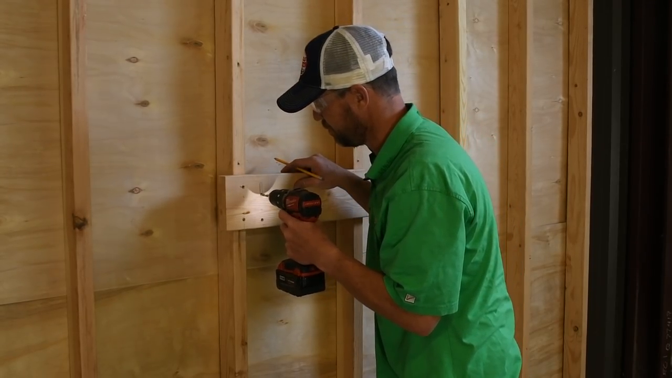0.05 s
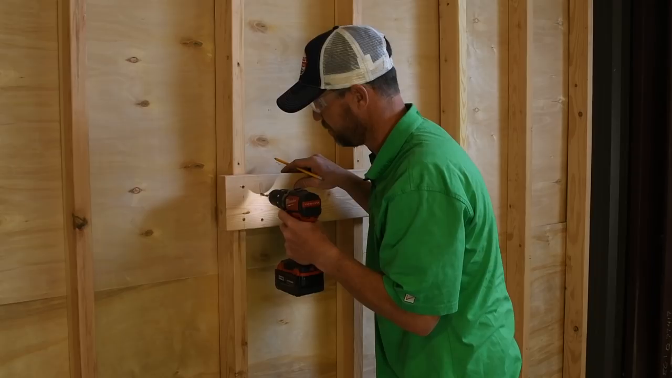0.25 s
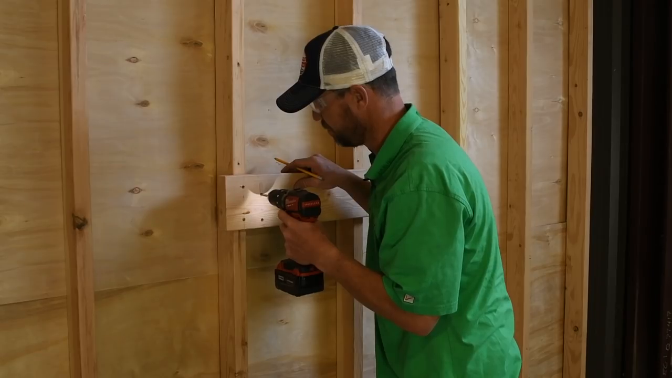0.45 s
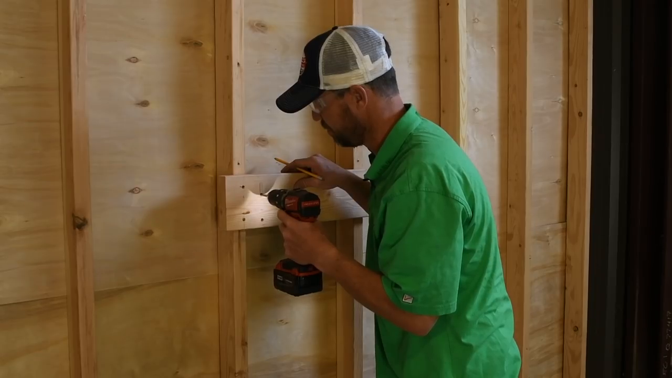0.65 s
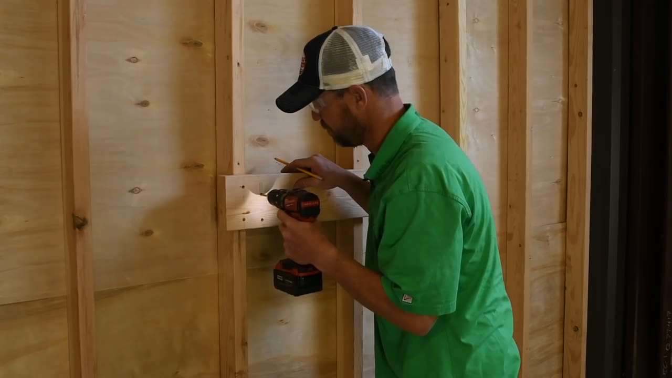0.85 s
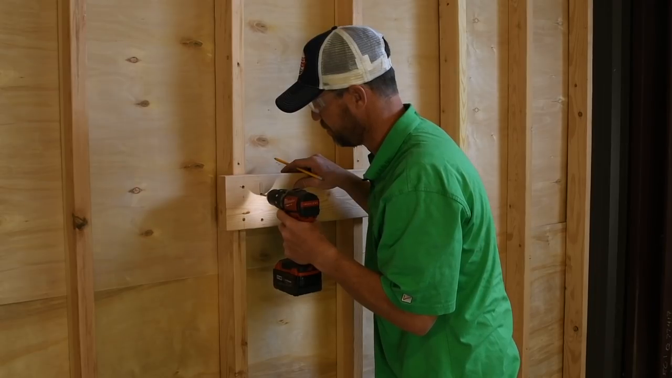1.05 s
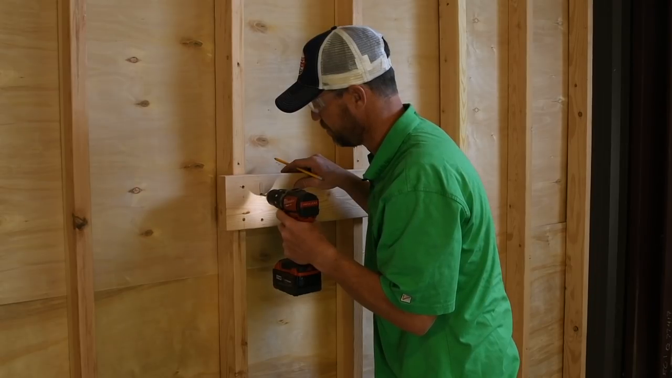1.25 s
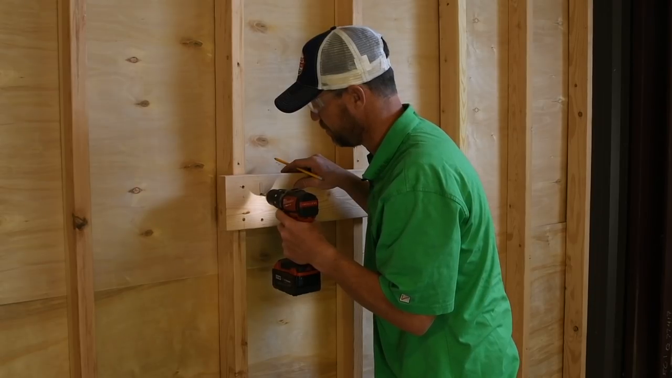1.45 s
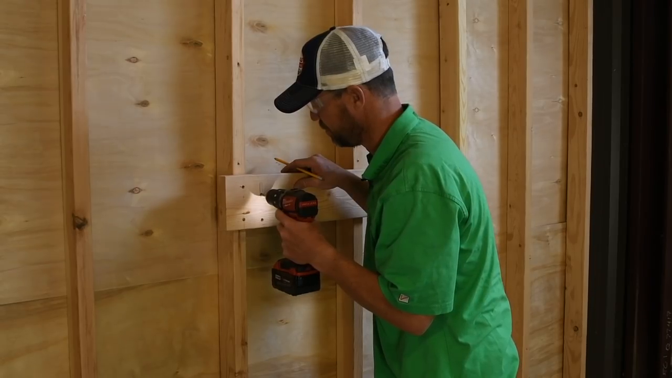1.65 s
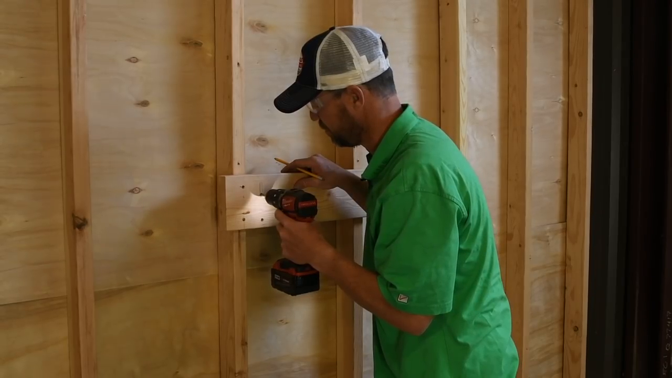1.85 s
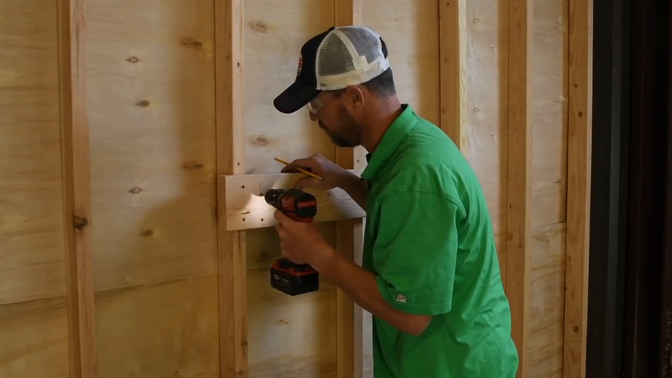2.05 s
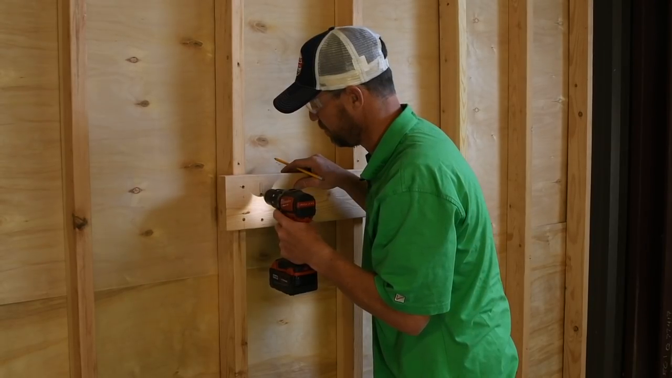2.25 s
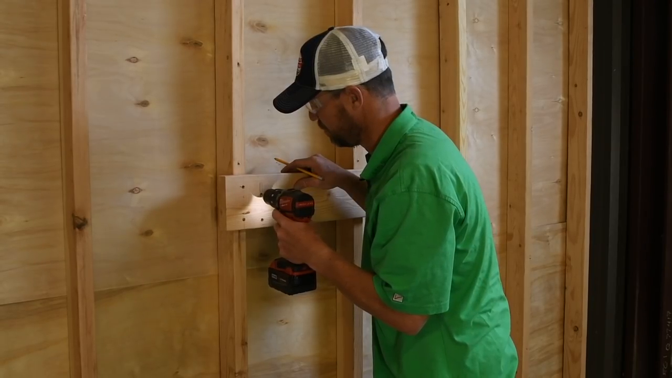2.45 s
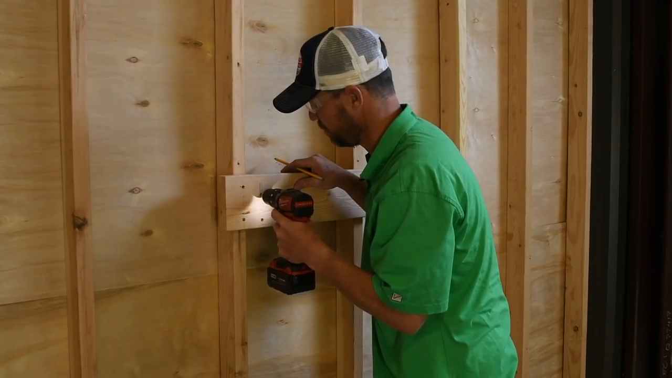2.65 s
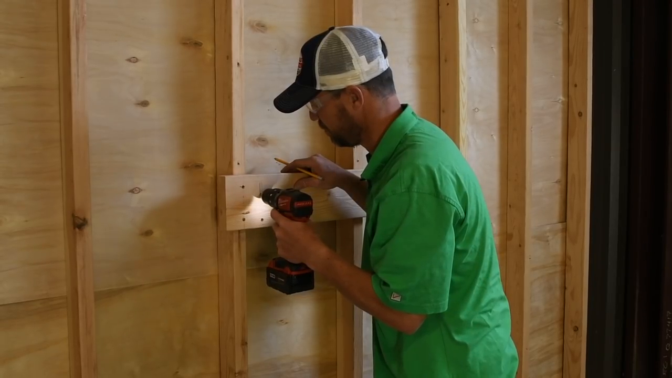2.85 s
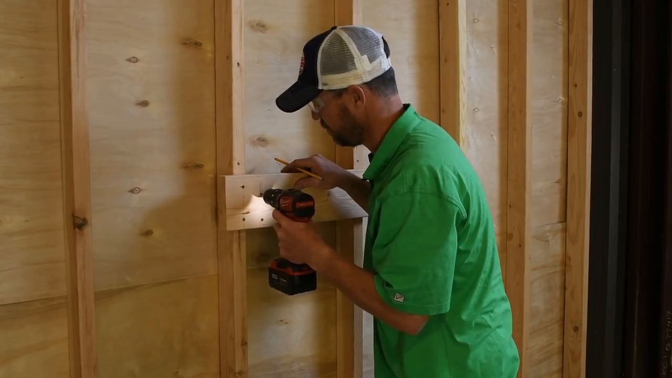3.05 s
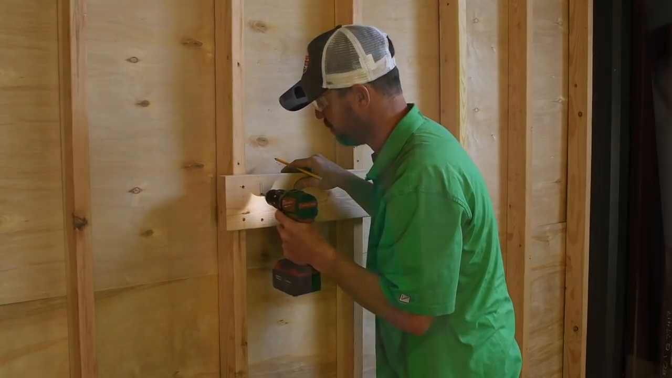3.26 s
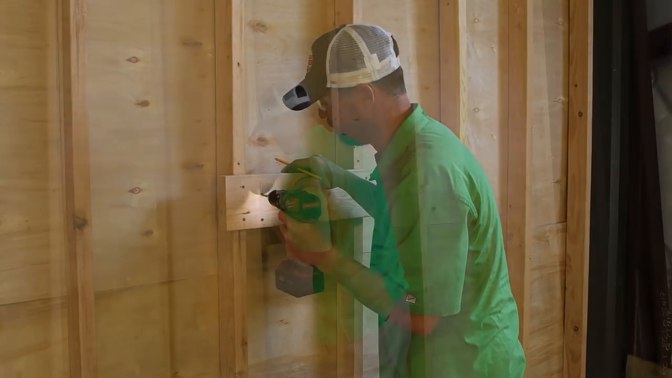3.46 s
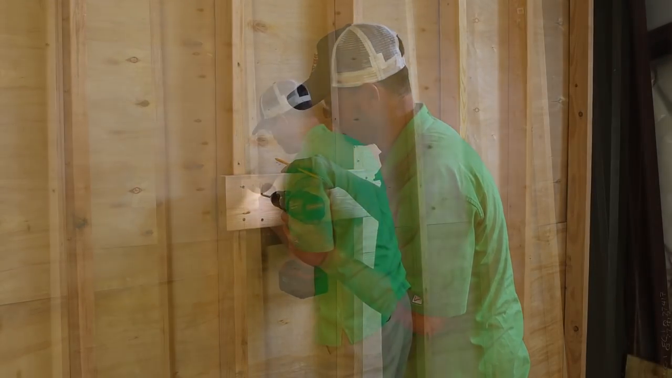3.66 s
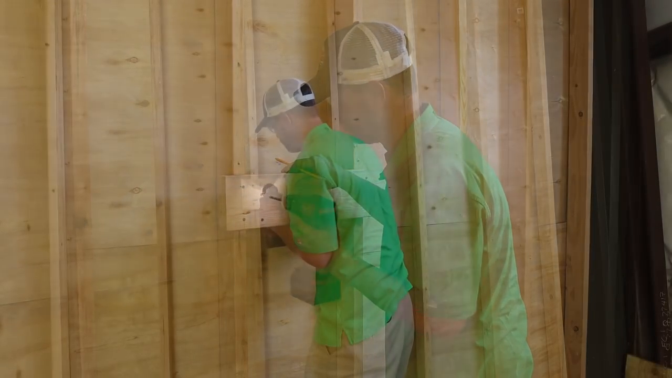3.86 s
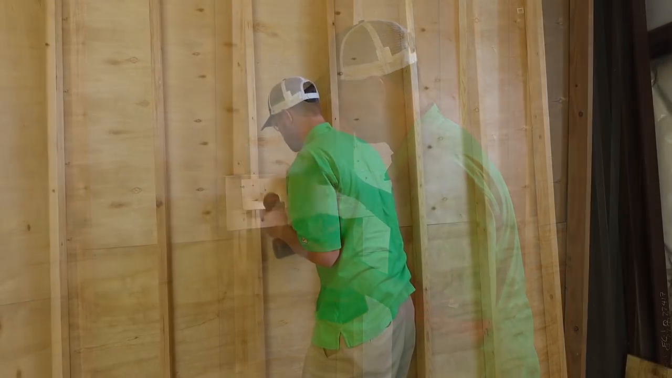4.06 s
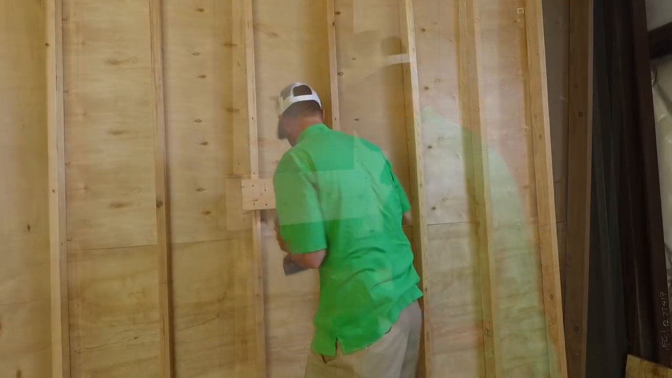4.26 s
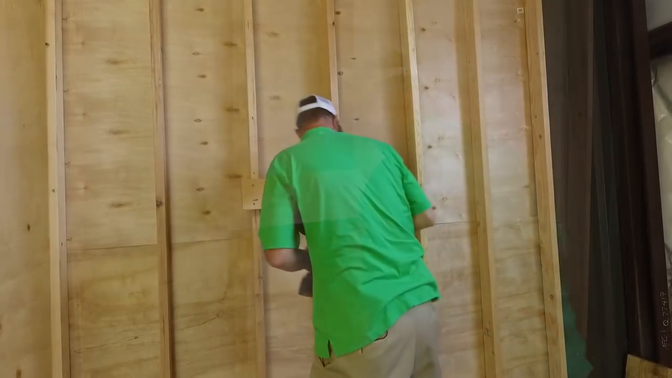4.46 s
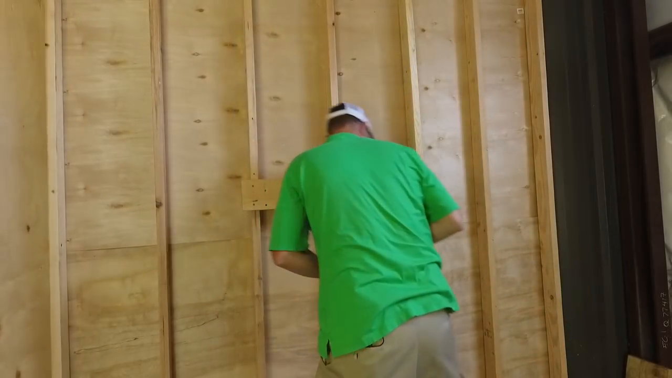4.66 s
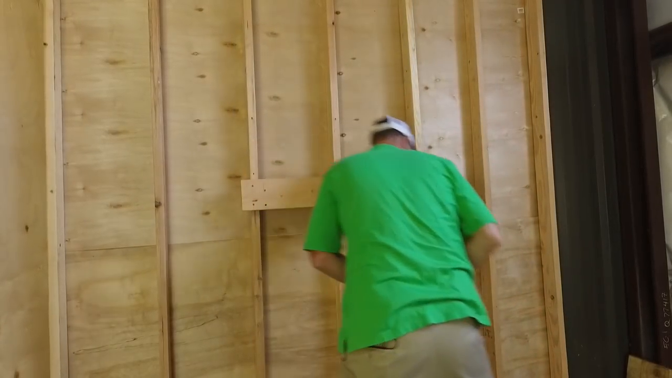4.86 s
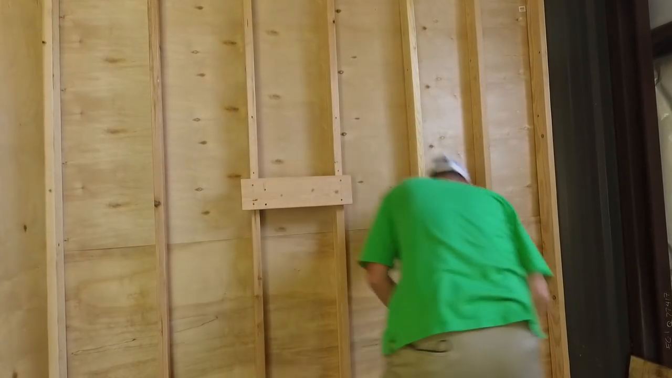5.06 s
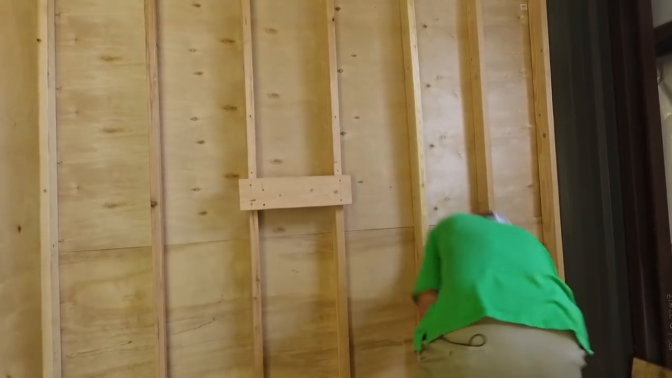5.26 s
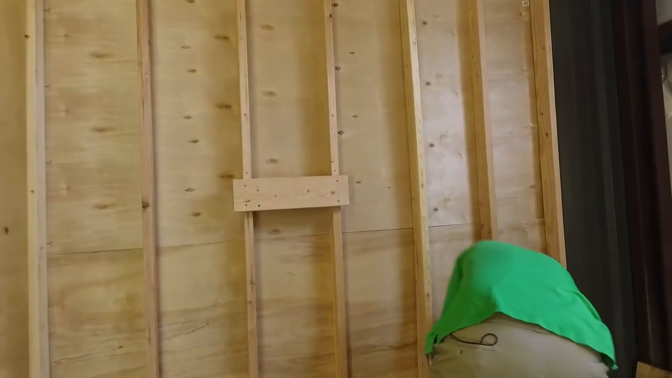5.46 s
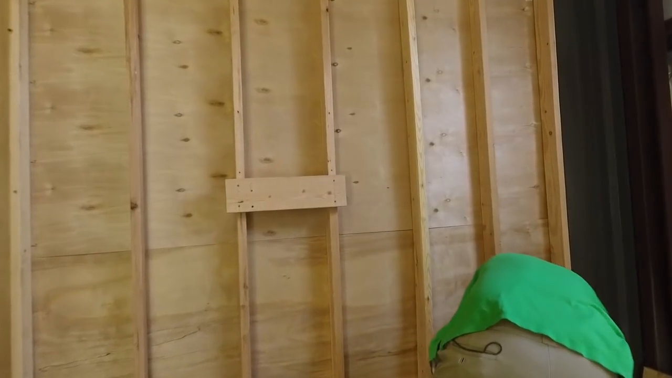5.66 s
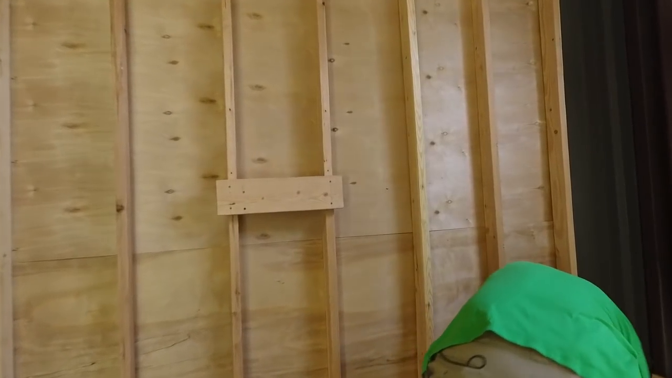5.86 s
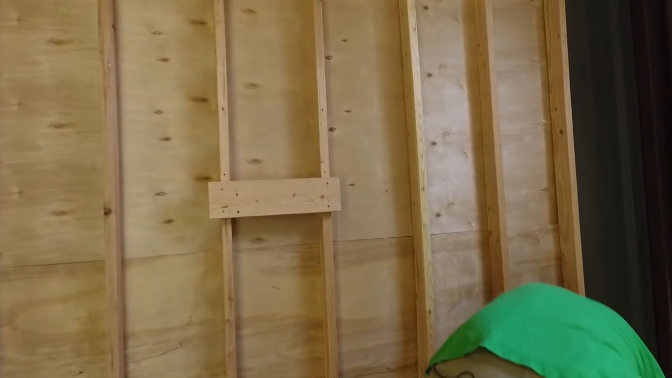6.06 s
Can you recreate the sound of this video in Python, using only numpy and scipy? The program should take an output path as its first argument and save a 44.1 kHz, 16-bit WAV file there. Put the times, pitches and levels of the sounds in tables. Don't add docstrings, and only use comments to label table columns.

```python
import sys
import numpy as np
from scipy import signal
from scipy.fft import rfft, irfft
from scipy.io import wavfile
from scipy.ndimage import uniform_filter1d

SR = 44100
rng = np.random.default_rng(int(sys.argv[2]) if len(sys.argv) > 2 else 0)


def transcribe(u):
    v = np.clip(np.atleast_2d(u).T, -1, 1)
    q = np.round(v * 32767).astype(np.int16)
    wavfile.write(sys.argv[1], SR, q)


def volts_from_db(level):
    exponent = np.asarray(level, float) / 20
    return 10 ** exponent


N = 269362


def evened(x):
    return x / np.sqrt(np.mean(abs(x) ** 2) + 1e-20)


def read(points, hz):
    f, value = np.transpose(points)
    return np.interp(np.log(hz + 1), np.log(f + 1), value)


def played(rows):
    s, *columns = np.transpose(rows)
    t = np.arange(N) / SR
    gate = np.clip(np.minimum(t - s[0] + (s[0] < .01), s[-1] - t) / 0.0032, 0, 1)
    return gate, [np.interp(t, s, c) for c in columns]


def add(mix, s, sound):
    part = mix[round(s * SR):][:len(sound)]
    part += sound[:len(part)]


def coloured(x, points):
    gain = volts_from_db(read(points, np.fft.rfftfreq(N, 1 / SR)))
    return evened(irfft(rfft(x) * gain, N))


def ringing(x, modes):
    hz = np.fft.rfftfreq(N, 1 / SR)
    gain = 0
    for k, (f, width, db) in enumerate(modes):
        gain = gain + (-1) ** k * volts_from_db(db) / (1 + 2j * (hz - f) / width) ** 2
    return evened(irfft(rfft(x) * gain, N))


def wander(hz):
    lowpass = signal.butter(2, hz, fs=SR, output="sos")
    return evened(signal.sosfilt(lowpass, rng.standard_normal(N)))


def stroke(top, hold, db, rise, sag, fall):
    t = np.arange(N) / SR - top
    return volts_from_db(db + rise * np.minimum(t, 0) - sag * np.clip(t, 0, hold) - fall * np.maximum(t - hold, 0))


def background_air():
    # f/Hz, level/dB per Hz
    hush = [(18, -34), (30, -18), (152, -5), (219, -2), (263, -2), (533, 0.5), (657, 2), (1110, 0),
            (2300, -6), (2700, -9.5), (3590, -12.5), (12000, -33), (15600, -58)]
    level_db = -63.5 + 1.2 * wander(16.0)
    return volts_from_db(level_db) * coloured(rng.standard_normal(N), hush)


def shed(x):
    # f/Hz, time to fall 60 dB/s
    echo_time = [(250, .6), (1000, 0.36), (3000, 0.54), (8000, 0.27)]
    taps = np.zeros(SR)
    at = np.arange(500, SR - 20, 20)
    taps[at + rng.integers(0, 20, len(at))] = rng.choice([-1., 1.], len(at))
    hz, t, z = signal.stft(taps, SR, nperseg=256)
    fade = volts_from_db(-60 * t / read(echo_time, hz)[:, None])
    tail = signal.istft(z * fade, SR, nperseg=256)[1]
    return signal.fftconvolve(x, tail / np.linalg.norm(tail))[:N]


def shoes():
    # top/s, hold/s, level/dB, grit over sole/dB
    drags = [
        (5.116, 0.12, -61, -10.5),
        (5.279, 0.064, -49.5, -11.5),
        (5.39, 0.34, -63.5, -10),
        (5.904, 0.035, -76, -28),
        (5.955, 0.02, -44, -18),
        (5.987, 0.033, -50, -16),
    ]
    # f/Hz, width/Hz, level/dB
    sole_modes = [(864, 670, -10), (1530, 520, -1), (2350, 820, -10), (3070, 1900, -18)]
    # t/s, f/Hz, level/dB
    squeak_path = [(5.945, 4420, -78), (5.96, 4580, -43), (5.975, 4800, -41), (5.995, 4880, -51),
                   (6.005, 4900, -74), (6.11, 4790, -68)]
    grit = rng.standard_normal(N) * volts_from_db(1.7 * wander(150))
    sole = ringing(grit, sole_modes)
    fine = ringing(grit, [(5050, 3300, -0.5), (7660, 3500, -6.5)])
    out = np.zeros(N)
    for top, hold, db, grit_db in drags:
        out += stroke(top, hold, db, rise=452, sag=40, fall=502) * (sole + volts_from_db(grit_db) * fine)
    gate, (hz, db) = played(squeak_path)
    phase = 2 * np.pi * np.cumsum(hz) / SR + 0.6 * wander(120)
    return out + gate * volts_from_db(db + 3.0 * wander(90)) * np.cos(phase)


def cloth():
    # top/s, hold/s, rumble level/dB, upper edge f/Hz, rise/dB per s
    rubs = [
        (4.268, 0.067, -76, 450, 147),
        (4.604, .005, -68, 150, 700),
        (4.675, 0.035, -48.5, 230, 598),
        (4.741, 0.16, -68, 70, 300),
        (4.89, 0.045, -52.5, 250, 302),
        (4.98, 0.18, -34.5, 250, 202),
        (5.155, 0.15, -37, 168, 300),
        (5.383, 0.047, -57, 100, 300),
    ]
    # t/s, peak level/dB, f/Hz
    snaps = [
        (4.69, -45, 118),
        (4.936, -41, 166),
        (4.976, -29, 130),
        (5.049, -37, 104),
        (5.1395, -18, 90),
        (5.158, -27, 85),
        (5.215, -28, 90),
        (5.232, -27, 90),
    ]
    lumps = rng.standard_normal(N) * volts_from_db(4.6 * wander(36))
    dull, sharp = (ringing(lumps, [(90, 120, 0), (hz, hz, -10)]) for hz in (170, 300))
    out, t = np.zeros(N), np.arange(3000) / SR
    for top, hold, db, edge_hz, rise in rubs:
        share = np.clip(edge_hz / 450, 0, 1)
        rumble = (1 - share) * dull + share * sharp
        out += 1.1 * stroke(top, hold, db, rise, sag=12, fall=292) * rumble
    for s, peak_db, hz in snaps:
        falling_hz = hz * (1 + 2.54 * np.exp(-t / 0.004))
        phase = 2 * np.pi * np.cumsum(falling_hz) / SR
        shape = (1 - np.exp(-t / .0012)) * np.exp(-t / .011)
        add(out, s, -volts_from_db(peak_db) * np.sin(phase) * shape)
    return out


def clanks():
    # t/s, peak level/dB, brightness above 4 kHz/dB, ring/s
    blows = [(3.859, -16, -14.5, 0.037), (3.873, -21.5, -18, 0.033), (3.884, -17.5, -18, 0.043),
             (3.901, -20.5, -12, 0.037), (3.924, -42, -32, 0.05), (3.944, -49, -14, .04),
             (4.26, -59, -41, 0.27), (5.138, -36, -36, 0.018), (5.618, -34, -25, 0.088),
             (5.63, -34.5, -26, 0.058), (5.84, -54, -21, 0.068), (6.079, -40, -26, .04)]
    # f/Hz, width/Hz, level/dB
    timber_modes = [(560, 220, -3), (950, 260, 0), (1350, 260, 0), (1700, 200, -3), (2050, 260, 0),
                    (2900, 700, -24)]
    # t/s, f/Hz, level/dB
    buckle = (5.148, 2830, -55)
    out, t = np.zeros(N), np.arange(5000) / SR
    wood = ringing(rng.standard_normal(N), timber_modes)
    crack = ringing(rng.standard_normal(N), [(5350, 4100, 1), (8500, 3400, -7)])
    onset = np.sin(np.pi / 2 * np.minimum(t / .003, 1)) ** 2
    for s, db, bright_db, ring in blows:
        blow = (wood + volts_from_db(bright_db) * crack)[round(s * SR):][:len(t)]
        shape = volts_from_db(db - 60 * t / ring) * onset
        add(out, s, .6 * shape[:len(blow)] * blow)
    s, hz, db = buckle
    add(out, s, volts_from_db(db - 60 * t / 0.099) * np.sin(2 * np.pi * hz * t) * np.minimum(t / .002, 1))
    return out


def squeaks():
    # t/s, peak level/dB, f/Hz
    chirps = [(2.62, -24.5, 4290), (2.6421, -22, 4830), (2.6854, -19.5, 4680), (2.7297, -29.5, 4700),
              (2.7728, -21.5, 4830), (2.816, -21, 4740), (2.8609, -23, 4800), (2.903, -21, 4730),
              (2.9462, -18, 4740), (2.9892, -20, 4820), (3.0324, -31, 4660), (3.0784, -33, 4780),
              (3.2913, -32, 5170)]
    # t/s, level/dB, f/Hz
    jolts = [
        (2.685, -45, 140),
        (2.946, -31, 250),
        (2.989, -30, 400),
    ]
    out, t = np.zeros(N), np.arange(1600) / SR
    shape = np.minimum(t / 0.0016, 1) * np.exp(-(np.maximum(t - .002, 0) / 0.0062) ** 1.5)
    for (s, db, hz), noise in zip(chirps, rng.standard_normal((len(chirps), 1600))):
        slip = evened(signal.lfilter([1], [1, -.9], noise))
        phase = 2 * np.pi * np.cumsum(hz * (1.015 - 3.2 * t + 0.024 * slip)) / SR
        overtones = volts_from_db(db + 4.5) * np.sin(2 * phase) + volts_from_db(db - 28.5) * np.sin(3 * phase)
        add(out, s - .0015, volts_from_db(db) * shape * (np.sin(phase) + shape * overtones))
    for s, db, hz in jolts:
        add(out, s, volts_from_db(db) * np.cos(2 * np.pi * hz * t) * t / 0.0042 * np.exp(1 - t / 0.0026))
    return out


FULL_HZ = 350
GEAR_RATIO = 15.2


def motor():
    # t/s, shaft speed aimed at/Hz, lag/s, pinion load/dB, chopping of the switch/dB
    stages = [
        (0, 188.2, .065, -8, 10),
        (.312, 350.4, .045, 0, 5),
        (1.2, 350.9, .2, -1, 1),
        (2.2, 347, .2, -1, -3),
        (2.55, 350.8, .25, -1, -6),
        (2.99, 260, .1, 0, 10),
        (3.205, 381, .02, 2, 5),
        (3.3, 387.3, .16, -12, -25),
        (3.825, 387.3, .16, 2, -25),
    ]
    spin_up_hz_per_s, brake_s, stop_s = 1120, 3.77, 3.873
    ms = np.arange(0, N / SR, .001)
    stage = np.searchsorted([row[0] for row in stages], ms, "right") - 1
    aim, lag, load_db, chop_db = np.array(stages)[stage, 1:].T
    driven = [154.4]  # Hz, already turning
    for hz, s in zip(aim[1:], lag[1:]):
        pull = min((hz - driven[-1]) / max(s, .005), spin_up_hz_per_s)
        driven.append(driven[-1] + .001 * pull)
    t = np.arange(N) / SR

    def smooth(curve, span_ms):
        return np.interp(t, ms, uniform_filter1d(np.array(curve), size=span_ms, mode="nearest"))

    driven, load_db, chop_db = smooth(driven, 15), smooth(load_db, 40), smooth(chop_db, 80)
    speed = driven - 12000 * (np.clip(t, brake_s, stop_s) - brake_s) ** 2
    gate = np.clip((stop_s - t) / 0.0022, 0, 1)
    return gate, driven, speed, load_db, chop_db


def rattle():
    # f/Hz, width/Hz, level/dB
    body_modes = [(1089, 237, -2.5), (1260, 185, -4), (1403, 161, -5), (1591, 210, -10.5)]
    # f/Hz, level/dB per Hz
    growl_colour = [(18, -88), (30, -57), (205, -22), (345, -14), (377, -13), (503, -7.5), (950, -3),
                    (1240, -42), (2090, -120)]
    # f/Hz, width/Hz, level/dB
    mesh_modes = [(2063, 720, -1.5), (2880, 890, -7), (3898, 544, -5.5), (4207, 1180, -10.5),
                  (5360, 640, -16), (6430, 470, -24.5)]
    # f/Hz, level/dB per Hz
    hiss_colour = [(3240, -52), (5500, -4.5), (6690, -6.5), (7260, 1.5), (8210, 1), (10400, -22),
                   (11800, -26), (14900, -38.5), (15600, -56.5)]
    # f/Hz, width/Hz, level/dB
    slot_modes = [(7850, 116, 8.5), (8300, 180, -30), (7480, 67, -17)]
    gate, driven, speed, load_db = motor()[:4]
    octaves = np.log2(driven / FULL_HZ)
    chuck = 2 * np.pi * np.cumsum(speed) / SR / GEAR_RATIO
    throb_db = 0.28 * np.cos(chuck) + 0.28 * np.cos(2 * chuck + 0.94)
    throb_db += 0.16 * wander(140) + 0.69 * wander(3.1)
    knock_strength = volts_from_db(2.0 * np.minimum(rng.exponential(1, N), 4))
    teeth = rng.standard_normal(N) * knock_strength * (rng.random(N) < .3)
    air = rng.standard_normal(N) * volts_from_db(0.48 * wander(330))
    hiss = coloured(air, hiss_colour) + volts_from_db(-12.5) * ringing(air[::-1], slot_modes)
    parts = volts_from_db(-26.5 + 12.5 * octaves) * ringing(teeth, body_modes)
    parts += volts_from_db(-35 + 10.5 * octaves + 0.11 * load_db) * coloured(teeth, growl_colour)
    parts += volts_from_db(-35 + 8.5 * octaves) * ringing(teeth, mesh_modes)
    parts += volts_from_db(-44.5 + 11.5 * octaves) * hiss
    parts = signal.sosfilt(signal.butter(2, 90, "highpass", fs=SR, output="sos"), parts)
    let_go_db = 2.5 * np.tanh((driven - speed) / 12)
    return gate * volts_from_db(throb_db - let_go_db) * parts


def whine():
    # multiple of the shaft speed, level/dB
    order_lines = [(2, -52), (3, -38), (4, -36), (6.06, -54), (11.3, -59), (12.3, -57), (21, -68),
                   (24, -74), (34.08, -88), (34.8, -88), (34.92, -86), (38.08, -92), (42.08, -97)]
    # multiple of the chuck speed, level/dB
    chuck_lines = [(4, -82), (5, -75), (6, -74), (8, -74)]
    # f/Hz, level/dB
    housing = [(1400, -11), (2200, -10.5), (2800, -0.5), (3050, 3.5), (3550, -8), (4150, -0.5),
               (4600, -5.5), (5600, -15)]
    slots, pinion, twice, poles = 8, 13, 16, 20
    switch_hz = 9907.5
    gate, driven, speed, pinion_db, chop_db = motor()
    t = np.arange(N) / SR
    octaves = np.log2(speed / FULL_HZ)
    driven_octaves = np.log2(driven / FULL_HZ)
    acceleration = np.gradient(driven) * SR
    surge = np.tanh(np.maximum(acceleration / 1120, 0) ** 2)
    coast = np.tanh(np.maximum(-acceleration / 90, 0))
    braked = driven - speed
    turn = 2 * np.pi * np.cumsum(speed) / SR
    turn = turn + (0.057 * np.tanh(braked / 30) + .02 * surge) * wander(160)

    slots_db = -36.5 + read(housing, slots * speed) + 4 * surge
    slots_db += 0.28 * braked - 13 * np.tanh(braked / 22)
    twice_db = -39.5 + read(housing, twice * speed)
    twice_db += np.maximum(190 * (driven_octaves - .1), -5 * octaves)
    twice_db += -0.098 * braked - 7 * coast - 6 * np.exp(-t / 0.042)
    poles_db = -54.5 + 22.0 * octaves - 60 * np.maximum(octaves, 0)
    snatch_db = -38.5 - 184 * t
    load_db = -1.5 + 19.5 * octaves
    shaft_db = -53.5 + 40 * np.log2(np.minimum(speed / 270, 1)) - 18 * surge

    lines = [(slots, slots_db), (twice, twice_db), (poles, poles_db)]
    lines += [(28, twice_db - 26 + load_db), (32, twice_db - 33), (12, -56)]
    lines += [(k, db + load_db) for k, db in order_lines]
    lines += [(1, shaft_db), (poles, snatch_db), (2 * twice, 0.51 * snatch_db - 35)]
    lines += [(k / GEAR_RATIO, db + load_db) for k, db in chuck_lines]
    out = np.zeros(N)
    for k, db in lines:
        phase = k * turn + 0.087 * wander(28) + 6 * rng.random()
        out += volts_from_db(db + 0.24 * wander(51)) * np.cos(phase)

    mesh = pinion * turn + 0.49 * wander(45)
    pinion_db = pinion_db - 32.5 + read(housing, pinion * speed) + 55 * np.minimum(octaves + 0.28, 0)
    overtones = volts_from_db(-18 + load_db) * np.cos(2 * mesh) + volts_from_db(-42 + 3 * load_db) * np.cos(3 * mesh)
    out += volts_from_db(pinion_db) * (np.cos(mesh) + overtones)

    carrier = 2 * np.pi * switch_hz * t
    beat = 4 * turn
    off_db = np.minimum(chop_db + 6, 0)
    out += volts_from_db(-66 - 6 * octaves + off_db) * np.cos(carrier - beat)
    out += volts_from_db(-72.5 + chop_db) * np.cos(carrier + beat)
    out += volts_from_db(-81.5 - 19 * octaves + off_db) * np.cos(carrier - 2 * beat)
    return np.sqrt(2) * gate * out


def scene():
    drill = whine() + rattle() + squeaks() + clanks()
    feet = shoes()
    echoes = shed(volts_from_db(-18.0) * drill + volts_from_db(-17) * feet)
    return (drill + feet + echoes + cloth() + background_air())[None]


def top_cut(x):
    return signal.sosfilt(signal.butter(12, 15700, fs=SR, output="sos"), x)


def record(dry):
    heard = signal.sosfilt(signal.butter(2, 45, "highpass", fs=SR, output="sos"), dry)
    return top_cut(heard)


dry = scene()
out = record(dry)
transcribe(out)
```